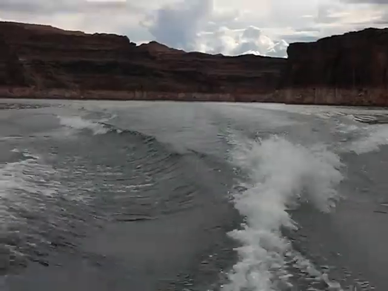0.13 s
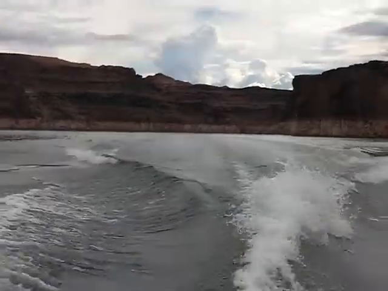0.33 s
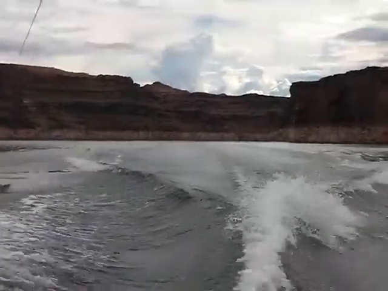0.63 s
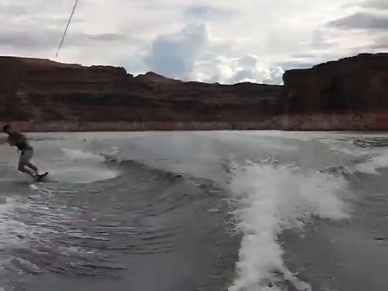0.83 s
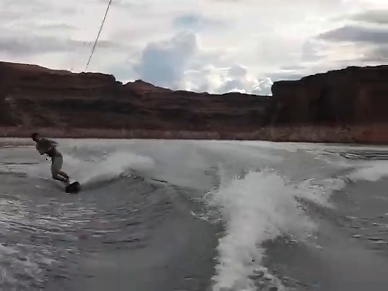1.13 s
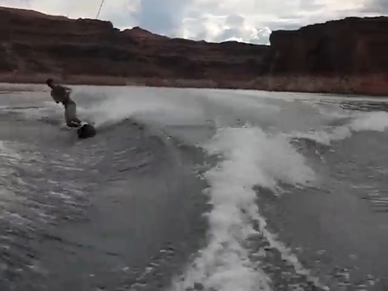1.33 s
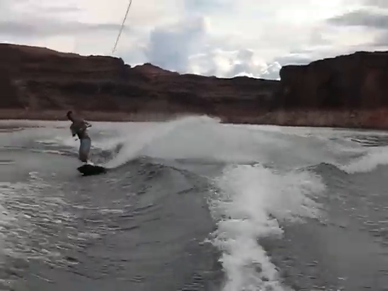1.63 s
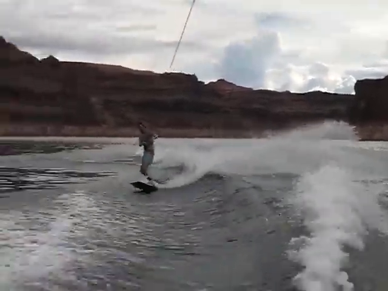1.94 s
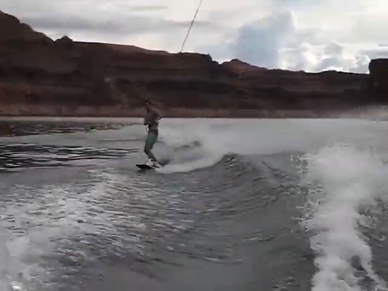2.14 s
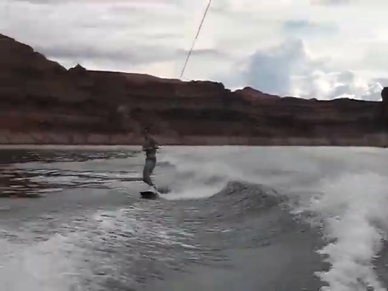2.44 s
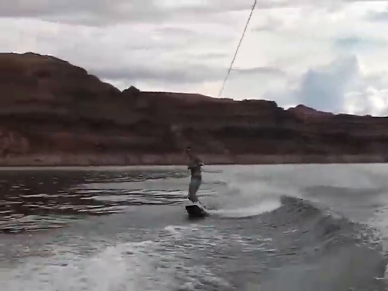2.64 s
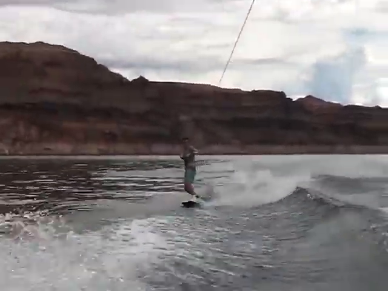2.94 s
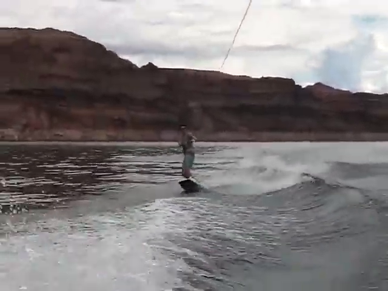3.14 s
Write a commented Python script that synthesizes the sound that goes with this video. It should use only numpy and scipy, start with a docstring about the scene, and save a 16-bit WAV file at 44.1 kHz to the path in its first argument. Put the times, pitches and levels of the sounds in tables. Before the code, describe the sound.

Silence until about 0.25 s, then a motorboat engine starts abruptly at full level: a deep, buzzing exhaust drone near 130 to 210 Hz, almost constant in pitch, dipping slightly around 0.7 s. Propeller hum, faint whine and a metallic ringing rattle near 3 kHz colour it. Broadband wake rush continues throughout; wind rumble bumps near 1.1 and 3.05 s. It ends still running at about 3.3 s.

```python
"""A quarter second of silence opens abruptly onto the stern of a towing boat at steady throttle.
An eight-cylinder four-stroke drones through its wet exhaust as a sum of cycle orders; sines tied to the
same cycle give the propeller hum, a thin alternator whine and one swelling order. Random valve-train
ticks excite ringing bands, the low ones those of engine-bay panels; banded noise makes the wake's rush
and the wind's rumble on the microphone."""
import sys
import numpy as np
from scipy import signal
from scipy.io import wavfile

SR = 44100
rng = np.random.default_rng(int(sys.argv[2]) if len(sys.argv) > 2 else 0)


def store_wav(level_fs):
    """Save 16-bit WAV to argv[1]."""
    pcm = np.round(np.clip(np.atleast_2d(level_fs), -1, 1) * 32767)
    wavfile.write(sys.argv[1], SR, pcm.T.astype(np.int16))


def magnitude_from_level(level_db):
    """Linear magnitude for a level in decibels (20 dB per decade)."""
    exponent = np.asarray(level_db, float) / 20
    return 10 ** exponent


N = 145089

# Engine speed and drone. Each row: time in seconds, frequency of the 36th cycle order in Hz,
# level in dB before the drone's trim.
ENGINE_CURVE = [(0.3, 943, -18), (0.54, 941.6, -19), (0.7, 938, -17.5), (0.74, 935, -21), (0.77, 947, -19),
                (1.22, 950, -19.5), (1.43, 943, -18), (1.73, 939.7, -20), (2.09, 941.6, -18.5),
                (2.11, 945, -20), (2.13, 941.5, -19), (2.9, 951.4, -19), (3.19, 951.2, -20),
                (3.29, 949.0, -20.5)]
# Exhaust and driveline orders of the four-stroke cycle. Each row: multiple of the cycle rate,
# relative level in dB.
ORDER_LEVELS = [(1, -40), (2, -82), (3, -36), (4, -34), (5, -1), (6, 1), (7, -5.5), (8, -1), (9, -10.5),
                (10, -18), (11, -24.5), (12, -24), (13, -27), (14, -15.5), (15, -19.5), (16, -19),
                (17, -23), (18, -31.5), (19, -31), (20, -17), (21, -21.5), (22, -16), (23, -24.5),
                (24, -34), (25, -17.5), (26, -22), (27, -31), (28, -18), (29, -28), (30, -19.5), (31, -20),
                (32, -42.5), (33, -46), (34, -33), (35, -22), (36, -13.5), (37, -33), (38, -43), (39, -19),
                (40, -29), (41, -24), (42, -28.5), (43, -18), (44, -32), (45, -53), (46, -40), (47, -20),
                (48, -22.5), (49, -29.5), (50, -19.5), (51, -55.5), (52, -25), (53, -34), (54, -17),
                (55, -37.5), (56, -43)]
# An order that swells by itself. Each row: time in seconds, level in dB rms.
SWELLING_ORDER_LEVEL = [(0.3, -45), (1.02, -43), (1.43, -43), (1.68, -52), (2.26, -36.5), (3.16, -40),
                        (3.29, -44)]
# Propeller blade hum. Each row: time in seconds, level in dB rms.
BLADE_LEVEL = [(.3, -29), (.7, -28), (1.0, -31), (1.4, -28), (1.7, -31), (2.1, -30), (2.5, -32), (2.9, -28),
               (3.29, -31)]
# Second harmonic of the blade hum. Each row: time in seconds, level in dB rms.
BLADE_OCTAVE_LEVEL = [(0.3, -36), (0.49, -45), (1.37, -44.5), (1.53, -28), (2.13, -46), (2.29, -34),
                      (2.95, -48), (2.99, -30), (3.29, -39)]
# Alternator whine. Each row: time in seconds, level in dB rms.
ALTERNATOR_LEVEL = [(.3, -46), (.7, -51), (1.1, -48), (1.35, -52), (1.6, -46), (2.0, -47), (2.3, -53),
                    (2.8, -53), (3.05, -49), (3.29, -50)]
# Ringing peaks, low and high. Each row: frequency in Hz, bandwidth in Hz.
RINGING_PEAKS = [(1255, 25), (1430, 70), (2020, 30), (2240, 46), (2735, 50), (2895, 40), (2994, 26),
                 (3180, 60), (3590, 90), (3800, 70), (4085, 40), (5130, 110), (5670, 40), (5960, 80),
                 (6350, 90), (7540, 60), (8190, 90), (8800, 120)]
# Relative height of each ringing peak, in the same order. One column: level in dB.
RINGING_HEIGHTS = [-5.5, -9.5, -8.5, -9.5, -7.5, -6.5, 4.5, -6.5, -8, -4.5, -9, -10.5, -7, -8.5, -17, -21,
                   -23, -19.5]
# Swell of the low ringing bands; its mean sets the whole rattle before the trim.
# Each row: time in seconds, level in dB.
LOW_RINGING_SWELL = [(0.26, -25.5), (0.43, -31), (0.53, -28), (0.56, -34), (0.61, -29.5), (0.83, -31),
                     (0.87, -35.5), (0.93, -30.5), (1.83, -30), (2.01, -28), (2.2, -33.5), (2.23, -30.5),
                     (2.96, -30), (3.01, -24), (3.05, -31), (3.29, -29)]
# Swell of the high ringing bands, used about its mean. Each row: time in seconds, level in dB.
HIGH_RINGING_SWELL = [(0.3, -37.5), (0.35, -41), (0.98, -40.5), (1.48, -39.5), (1.49, -39.5), (2.36, -43.5),
                      (2.38, -41.5), (3.04, -44), (3.29, -49)]
# Rush of the wake. Each row: time in seconds, level in dB before the wake's trim.
WAKE_SWELL = [(0.25, -24), (0.4, -24.5), (0.7, -26), (0.71, -27), (1.44, -24.5), (1.46, -22), (1.5, -26),
              (2.98, -25), (3.0, -29), (3.05, -26), (3.29, -25.5)]
# Swell of the spray's treble, used about its mean. Each row: time in seconds, level in dB.
SPRAY_SWELL = [(0.3, -35.5), (0.67, -36), (0.72, -40), (1.44, -36), (1.66, -38.5), (2.41, -37),
               (2.85, -41.5), (3.27, -38), (3.29, -39)]
# Shape of the wake's spectrum. Each row: frequency in Hz, relative density in dB per Hz.
WAKE_SPECTRUM = [(200, -17), (290, -5.5), (470, -10), (550, -8), (870, -13.5), (1390, -10), (1780, -15.5),
                 (2400, -15), (3300, -12), (4500, -13), (5500, -20), (7000, -17.5), (8300, -24),
                 (10000, -32.5), (11700, -32.5)]
# Rumble of the wind. Each row: time in seconds, level in dB before the wind's trim.
WIND_SWELL = [(0.3, -28), (0.73, -27), (0.78, -25.5), (0.82, -31), (1.09, -23.5), (1.14, -19.5),
              (1.19, -27), (2.94, -25.5), (2.99, -23.5), (3.05, -19), (3.14, -32), (3.29, -25)]
# Shape of the wind's spectrum. Each row: frequency in Hz, relative density in dB per Hz.
WIND_SPECTRUM = [(20, -34), (33, -28), (45, -19), (60, -14.5), (78, 1.5), (95, -3), (115, -6.5), (170, -11),
                 (220, -11), (275, -8.5), (450, -22.5)]

CYLINDERS, SPEED_ORDER = 8, 36  # one firing per cylinder and cycle; order that gives the speed
SWELLING_ORDER = 29
TONE_WAVER_HZ = 2.2  # rate at which tones waver in level
LOCKED_WAVER_DB = 0.02  # level spread of the orders locked to the cycle


def rms_one(x):
    """Normalise the mean power to one."""
    return x / np.sqrt(np.mean(x ** 2) + 1e-20)


def in_time(rows):
    """Linear interpolation of each column against time, one value per sample."""
    seconds, *columns = np.transpose(rows)
    return [np.interp(np.arange(N) / SR, seconds, column) for column in columns]


def drift(rate_hz):
    """Random fluctuation of rms 1: white noise through two equal poles with their corner at rate_hz."""
    step, settle = 40, 2000  # samples per slow point; slow points discarded
    r = np.exp(-2 * np.pi * rate_hz * step / SR)
    noise = rng.standard_normal(N // step + 2 + settle)
    slow = signal.lfilter([1], [1, -2 * r, r * r], noise)[settle:]
    return np.interp(np.arange(N) / step, np.arange(len(slow)), rms_one(slow - slow.mean()))


def banded_noise(spectrum, patchy_db):
    """Turbulence as third-octave noise bands, flickering partly together and partly alone; rms 1."""
    hz, db = np.transpose(spectrum)
    above_db = db[-1] if hz[-1] > 5000 else -90  # a wide spectrum holds its last density
    together = drift(7.4)
    white = rng.standard_normal((2, N))  # neighbouring bands take different noise
    edges = np.geomspace(20, 13000, 29)
    out = 0
    for k, (low, high) in enumerate(zip(edges, edges[1:])):
        centre_log = np.log(low * high) / 2
        gain_db = np.interp(centre_log, np.log(hz), db, left=-90, right=above_db)
        if gain_db <= -80:
            continue
        flicker_db = patchy_db * (0.58 * together + 0.39 * drift(7.5))
        band_pass = signal.butter(2, [low, high], "band", fs=SR, output="sos")
        out = out + magnitude_from_level(gain_db + flicker_db) * signal.sosfilt(band_pass, white[k % 2])
    return rms_one(out)


def tone(phase, waver_db):
    """Amplitude modulation of a sine by slow random wavering; rms near 1."""
    return np.sqrt(2) * magnitude_from_level(waver_db * drift(TONE_WAVER_HZ)) * np.sin(phase)


def wind():
    """Turbulent pressure on the microphone: low-frequency noise under a varying level."""
    trim_db, patchy_db = -1, 0.5
    level_db, = in_time(WIND_SWELL)
    return magnitude_from_level(level_db + trim_db) * banded_noise(WIND_SPECTRUM, patchy_db)


def wake(pulse):
    """Broadband flow noise, lightly modulated by the wet exhaust; the spray's treble swells apart."""
    trim_db, patchy_db, treble_from_hz = -0.39, 1.0, 7900
    level_db, = in_time(WAKE_SWELL)
    spray_db, = in_time(SPRAY_SWELL)
    rush = pulse * banded_noise(WAKE_SPECTRUM, patchy_db)
    low_pass = signal.butter(2, treble_from_hz, fs=SR, output="sos")
    body = signal.sosfiltfilt(low_pass, rush)
    treble_db = spray_db - spray_db.mean() + level_db.mean()
    treble = magnitude_from_level(treble_db) * (rush - body)
    return magnitude_from_level(trim_db) * (magnitude_from_level(level_db) * body + treble)


def rattle_ticks():
    """Impulsive excitation: random ticks of either sign, with exponentially spread levels."""
    ticks_per_s, spread_db = 1500, 4.5
    struck = rng.random(N) < ticks_per_s / SR
    strength = magnitude_from_level(spread_db * np.minimum(rng.exponential(1, N), 4))
    return struck * strength * rng.choice([-1, 1], N)


def rattle(pulse):
    """Forced resonance: valve-train ticks excite two-pole ringing bands; high bands swell apart from low."""
    trim_db, high_from_hz = 2.5, 4800
    low_db, = in_time(LOW_RINGING_SWELL)
    high_db, = in_time(HIGH_RINGING_SWELL)
    out = 0
    for (hz, width), peak_db in zip(RINGING_PEAKS, RINGING_HEIGHTS):
        r = np.exp(-np.pi * width / SR)
        poles = [1, -2 * r * np.cos(2 * np.pi * hz / SR), r * r]
        ring = rms_one(signal.lfilter([1, 0, -1], poles, rattle_ticks() * pulse + 1e-18))
        level_db = low_db if hz < high_from_hz else high_db
        swell_db = level_db - level_db.mean()
        # the root of the width turns peak height into rms
        out = out + magnitude_from_level(peak_db + swell_db) * np.sqrt(width) * ring
    return magnitude_from_level(trim_db + low_db.mean()) * rms_one(out)


def alternator(cycle):
    """Whine at a fixed ratio to the engine cycle, broadened by random phase modulation."""
    order, blur_rad, waver_db = 167.8, 1.0, 3.0
    level_db, = in_time(ALTERNATOR_LEVEL)
    return magnitude_from_level(level_db) * tone(order * cycle + blur_rad * drift(9.3), waver_db)


def swelling_order(cycle):
    """A single harmonic locked to the engine cycle, with a level curve of its own."""
    level_db, = in_time(SWELLING_ORDER_LEVEL)
    return magnitude_from_level(level_db) * tone(SWELLING_ORDER * cycle, LOCKED_WAVER_DB)


def propeller(cycle):
    """Blade-passing tone at a fixed ratio to the engine cycle, with its second harmonic."""
    blade_passes_per_cycle, waver_db = 5.47, 2.5
    blades = blade_passes_per_cycle * cycle + rng.uniform(0, 2 * np.pi)
    first_db, = in_time(BLADE_LEVEL)
    octave_db, = in_time(BLADE_OCTAVE_LEVEL)
    return magnitude_from_level(first_db) * tone(blades, waver_db) + magnitude_from_level(octave_db) * tone(2 * blades, waver_db)


def wandering_phase(cycle, multiple):
    """Loss of phase lock: an order's phase drifts by itself from a random start."""
    wander_rad = 0.021  # of the engine cycle, so it grows with the order
    return multiple * (cycle + wander_rad * drift(1.2)) + rng.uniform(0, 2 * np.pi)


def drone(cycle, level_db):
    """Harmonic series of the cycle: low orders phase-locked to the firing, higher ones wandering."""
    trim_db, high_waver_db = 1, 2
    pipe_order = 5.5  # orders below this exhaust-pipe resonance arrive inverted
    out = 0
    for k, order_db in ORDER_LEVELS:
        if k == SWELLING_ORDER:  # sounded by its own function
            continue
        if k <= CYLINDERS + 1:
            order = tone(k * cycle + np.pi * (k < pipe_order), LOCKED_WAVER_DB)
        else:
            order = tone(wandering_phase(cycle, k), high_waver_db)
        out = out + magnitude_from_level(order_db) * order
    return magnitude_from_level(level_db + trim_db) * rms_one(out)


def scene():
    """Superposition of all sources, the engine cycle driving both the tones and the gating."""
    firing_gate, crank_gate = 0.069, 0.02  # modulation depths; the crank turns twice a cycle
    order_hz, drone_db = in_time(ENGINE_CURVE)
    cycle = 2 * np.pi * np.cumsum(order_hz / SPEED_ORDER) / SR  # phase in radians
    pulse = 1 + firing_gate * np.cos(CYLINDERS * cycle) + crank_gate * np.cos(2 * cycle)
    background = wind() + wake(pulse) + rattle(pulse)
    whines = alternator(cycle) + swelling_order(cycle) + propeller(cycle)
    return (background + whines + drone(cycle, drone_db))[None]


def band_limit(x):
    """A steep low-pass at the top of the band."""
    return signal.sosfilt(signal.butter(12, 12640, fs=SR, output="sos"), x)


def record(dry):
    """Linear filtering by a narrow treble notch and a steep low-pass, then silence before the start."""
    notch_hz, notch_width_hz, cutoff_hz, start_s = 7740, 130, 12030, 0.2457
    b, a = signal.iirnotch(notch_hz, notch_hz / notch_width_hz, SR)
    notched = signal.lfilter(b, a, dry)
    low_pass = signal.ellip(14, 0.3, 70, cutoff_hz, fs=SR, output="sos")  # ripple, stop band in dB
    dulled = signal.sosfilt(low_pass, notched)
    mix = dulled * (np.arange(N) >= start_s * SR)
    return band_limit(mix)


dry = scene()
out = record(dry)
store_wav(out)
```